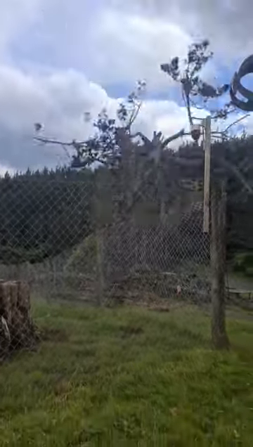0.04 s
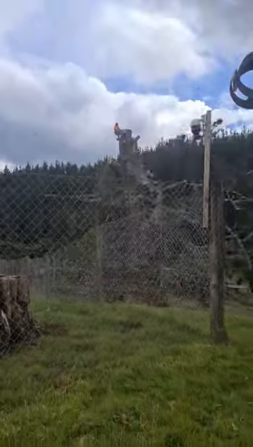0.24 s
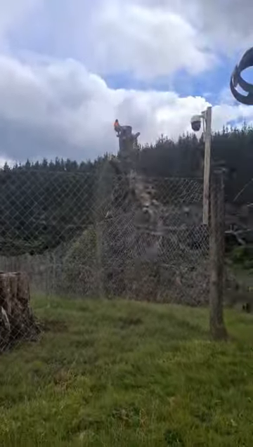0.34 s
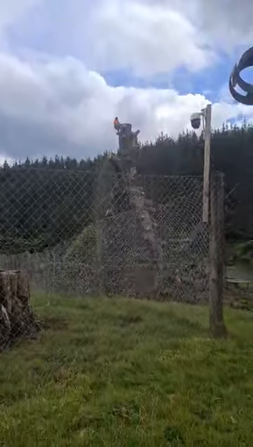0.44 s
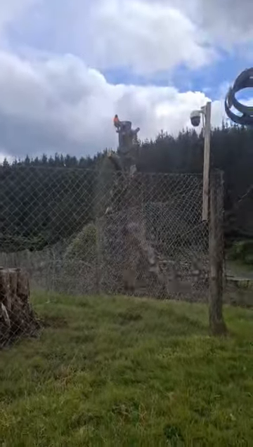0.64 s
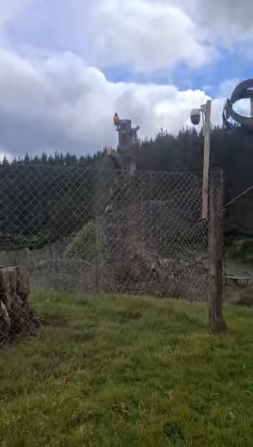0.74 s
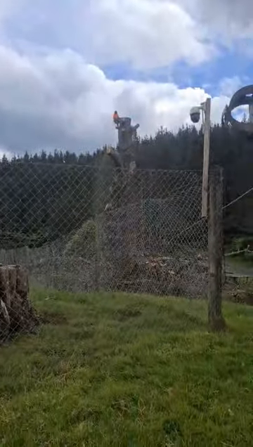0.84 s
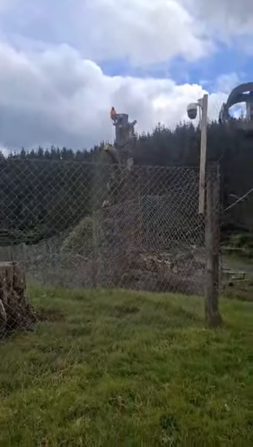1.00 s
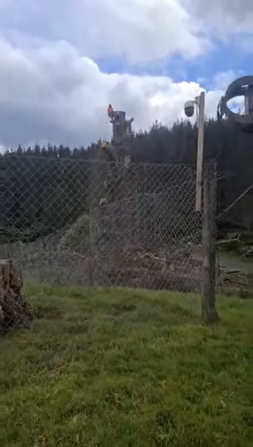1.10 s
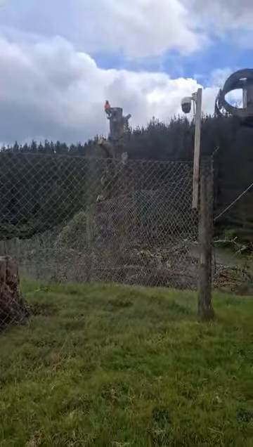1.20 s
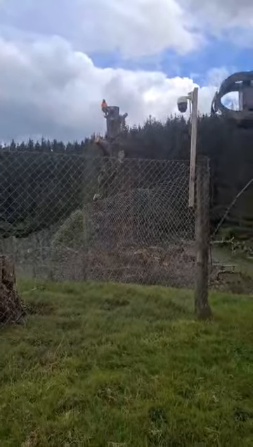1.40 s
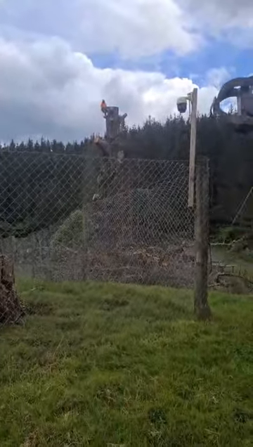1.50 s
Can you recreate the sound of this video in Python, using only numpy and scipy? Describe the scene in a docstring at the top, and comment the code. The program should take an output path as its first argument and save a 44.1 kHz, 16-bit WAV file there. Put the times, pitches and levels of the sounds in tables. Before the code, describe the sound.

A tree top crashes down in an open field. Sharp, brittle limb snaps start about 0.2 seconds in, with a growing rush of needles. From 0.5 to 1.1 seconds heavy wood thuds on the turf amid crackling twigs and loud cracks, echoing faintly. A low engine idles underneath and speeds up around 0.9 seconds. After 1.2 seconds only the engine and a few small snaps remain.

```python
"""In a field below a wooded hillside, a big conifer top falls. Its limbs snap in brittle bursts and ring
in damped modes, branches splinter, needles rush, and heavy wood thuds on the turf.
An engine idles nearby, sounding harmonics of its firing rate, and speeds up as the top lands.
The hillside returns the snaps as a faint, diffuse echo."""
import sys
import numpy as np
from scipy import signal
from scipy.fft import rfft, irfft, next_fast_len
from scipy.io import wavfile
from scipy.ndimage import map_coordinates

SR = 44100
rng = np.random.default_rng(int(sys.argv[2]) if len(sys.argv) > 2 else 0)


def digitize_waveform(pressure):
    """Quantize a signal to 16-bit integers and store it at the path in sys.argv[1].

    Rows of a 2-D input are taken as channels; values are limited to [-1, 1].
    """
    field = np.atleast_2d(pressure).T
    bounded = np.clip(field, -1, 1)
    quanta = np.round(bounded * 32767).astype(np.int16)
    wavfile.write(sys.argv[1], SR, quanta)


N = 68355

# limb fractures (time [s], relative levels of knock [dB], crack [dB] and fizz [dB], lowest mode [Hz])
LIMB_SNAPS = [(.0353,-21.5,-53,-54,1060),(0.1676,-44,-19.5,-38,1510),(0.2163,-17,-6,-21,1182),(0.219,-15,-33,-41,1210),(0.2635,-13,-14,-29,1163),(0.275,-19,-16.5,-33,1560),(0.3125,-17.5,-19,-41,870),(0.318,-17,-23,-42,1410),
              (0.378,-12,-9.5,-28,1605),(0.383,-11.5,-12.5,-33,1074),(0.3857,-19,-14.5,-36,1624),(.4170,-31,-16.5,-34,1400),(0.4365,-17.5,-24,-34,1190),(0.5022,-13,-34,-41,1180),(.5055,-16.5,-10,-21,1000),(0.521,-13,-33,-37,1450),(0.543,-18.5,-13,-26,1870),
              (0.5614,-4.5,-28,-34,1006),(0.5958,-10.5,-33,-28,1004),(.6000,-6.5,-32,-21,1290),(.6490,-12,-33,-19,1270),(0.691,-12,-32,-21,990),(0.696,-12.5,-32,-28,1440),(0.731,-11,-29,-26,1160),
              (0.7403,-11,-34,-16,1270),(0.795,-21,-17,-25,1440),(0.845,-12,-5,-16.5,1255),(0.865,-22,-26,-35,1370),(0.899,-14,-12,-31,1545),(0.9324,-51,-18,-44,1540),(.9655,-22,-25,-29,1170),
              (1.0125,-12.5,-16,-25,780),(1.0170,-15.5,-7.5,-24,1356),(1.0288,-15.5,-10,-48,1420),(1.0460,-17.5,-39,-44,1270),(1.0590,-17.5,-29,-38,960),(1.0755,-25,-23,-29,1530),(1.2670,-21.5,-41,-58,1050),(1.3290,-30,-36,-49,1144)]
# knock, crack and fizz of a snap (decay time [s], gain of the scattered part [dB])
SNAP_PARTS = [(0.0015, -13), (0.00083, -15), (.0008, -10)]
# modes of a limb (frequency [multiple of the lowest], gain [dB], decay time [s])
WOOD_MODES = [(1, -12, 0.0044), (2.53, -9.5, 0.0051), (3.52, -5, 0.0016), (4.3, -7.5, 0.0011)]
# heavy wood landing (time [s], peak level before the low-pass [dB], pitch [Hz], decay time [s])
TURF_IMPACTS = [(0.315,-23.5,109.6,0.087),(.375,-13.5,243,0.011),(.498,-19.5,240,0.013),(.515,-19,82,0.06),(0.546,-17.5,219,0.084),(0.613,-13,160,0.026),(.650,-8.5,196,0.06),(.662,-6.5,270,0.0082),(.718,-17.5,214,0.062),(.768,-7,309,0.024),
                (.790,-11.5,161,0.012),(0.848,-13,110,0.016),(.856,-8,280,0.045),(0.898,-15.5,181,0.019),(.912,-10.5,106,0.024),(.980,-15.5,306,0.04),(1.009,-7,262,0.0047),(1.005,-10,99,.016),(1.06,-11.5,310,0.012),(1.122,-11.5,297,0.014),(1.138,-15,84.5,0.019)]
# envelopes of drumming small limbs, breaking twigs and rushing needles (time [s], level [dB])
DRUMMING_ENVELOPE = [(0,-42.5),(.3,-29.5),(.48,-30),(.58,-19.5),(.68,-17),(.9,-17),(.96,-22),(1.13,-20),(1.2,-34),(1.55,-35.5)]
TWIG_ENVELOPE = [(0,-45),(.24,-39),(.46,-31),(.58,-21.5),(.68,-18.5),(.76,-21),(.83,-30),(.87,-22.5),(.98,-28.5),(1.06,-25.5),(1.14,-35.5),(1.2,-45),(1.55,-56)]
NEEDLE_ENVELOPE = [(0,-43),(.2,-35.5),(.48,-31.5),(.58,-24),(.75,-23),(.82,-27.5),(.87,-27),(.96,-31),(1.05,-31),(1.2,-44.5),(1.55,-77.5)]
# spectra of the same three (frequency [Hz], relative level [dB])
DRUMMING_SPECTRUM = [(25,-55),(55,-4.5),(90,-2.5),(180,1.5),(340,-1),(420,-8.5),(520,-18),(900,-45.5)]
TWIG_SPECTRUM = [(200,-25.5),(480,-7.5),(720,2.5),(1000,-5.5),(1350,0.5),(1900,-11.5),(2400,-7),(3300,-16),(5000,-26.5),(8000,-43),(16000,-26)]
NEEDLE_SPECTRUM = [(500,-17.5),(2000,3.5),(3300,-1.5),(4300,0),(6000,-0.5),(7200,-5.5),(10000,-6),(15000,-14)]
# thin, bright ticks (time [s], level [dB])
TREBLE_TICKS = [(.1470,-36),(0.1666,-23),(0.2218,-21.5),(.2915,-24),(.5438,-20),(0.748,-24),(1.061,-27),(1.201,-39),(1.4169,-27.5)]
# engine speed (time [s], firing rate [Hz])
FIRING_RATE = [(0,27.8),(.71,29.3),(.82,28),(1.0,42.3),(1.2,44.5),(1.36,44.7),(1.55,43)]
# exhaust harmonics (frequency [multiple of the firing rate], level at idle [dB], level at speed [dB])
EXHAUST_HARMONICS = [(1,-39,-29),(2,-31,-35),(3,-38,-39),(4,-45,-43),(5,-50,-46),(6,-48,-45)]
# engine clatter (frequency [Hz], relative level [dB])
CLATTER_SPECTRUM = [(25,-19),(60,-6.5),(150,-17.5),(280,-10.5),(400,-13.5),(600,-13),(850,-18.5),(1350,-13),(2000,-28),(2700,-27.5),(3500,-34.5),(6000,-36),(8000,-43.5),(15000,-47)]
# hillside reverberation (frequency [Hz], time to fall 60 dB [s])
HILL_T60 = [(100,1),(1200,1),(4000,0.46),(12000,0.22)]
# left-right likeness of the direct snaps and of all else (frequency [Hz], coherence [0 to 1])
SNAP_COHERENCE = [(500,0.59),(1400,0.73),(4500,0.48),(14000,0.3)]
FIELD_COHERENCE = [(100,1),(350,0.97),(700,0.72),(1400,0.73),(2500,0.44),(4500,0.26),(14000,0.12)]
# level difference between the ears (frequency [Hz], left minus right [dB])
EAR_BALANCE = [(60, 0), (99, -5), (160, 2), (270, -2), (450, -4), (740, 5), (1220, -6.5), (2010, 0.5),
               (3330, 0.5), (5500, -1), (9080, -1.5), (15000, -2.5)]


def snaps():
    """Brittle fracture: each limb fails in a burst that excites its modes; the crown scatters the sound."""
    out, t = np.zeros((2, N)), np.arange(SR // 12) / SR
    rise_s, scatter_s, direct_db = .00025, .0096, 2
    crack_hz, fizz_hz = (2700, 6100), (6500, 15000)
    rise = 1 - np.exp(-t / rise_s)
    for s, knock, crack, fizz, ring_hz in LIMB_SNAPS:
        knock_hz = (.8 * ring_hz, 1.7 * ring_hz)
        bands = knock_hz, crack_hz, fizz_hz
        for db, band_hz, (decay_s, scatter_db) in zip((knock, crack, fizz), bands, SNAP_PARTS):
            add(out, s, amp(db + direct_db) * burst(rise * np.exp(-t / decay_s), band_hz))
            add(out, s, amp(db + scatter_db) * burst(rise * np.exp(-t / scatter_s), band_hz))
        # the lowest mode scales with the knock, the upper three with the crack
        for db, (multiple, mode_db, decay_s) in zip((knock, crack, crack, crack), WOOD_MODES):
            ring = np.sin(2 * np.pi * (multiple * ring_hz * t + rng.random((2, 1))))
            add(out, s, amp(db + mode_db) * rise * np.exp(-t / decay_s) * ring)
    return spread(out, SNAP_COHERENCE)


def thuds():
    """Damped impact: each heavy limb hits the turf with a dull, narrow-band boom that dies quickly."""
    out, t = np.zeros((2, N)), np.arange(SR // 5) / SR
    rise_s, width_octaves, cutoff_hz = .0033, .32, 430
    for s, db, pitch_hz, decay_s in TURF_IMPACTS:
        band = lambda hz: np.exp(-.5 * (np.log2((hz + 1) / pitch_hz) / width_octaves) ** 2)
        rumble = filtered(rng.standard_normal((2, len(t))), band)
        boom = np.cos(np.angle(signal.hilbert(rumble)))  # steady amplitude, wandering pitch
        envelope = (1 - np.exp(-t / rise_s)) ** 2 * np.exp(-t / decay_s)
        add(out, s, amp(db) * envelope / envelope.max() * boom)
    return spread(filtered(out, lambda hz: 1 / (1 + (hz / cutoff_hz) ** 10)))


def crown():
    """Incoherent summation: the collapsing crown's many small impacts and fractures merge into noise."""
    drumming_gain = amp(curve(DRUMMING_ENVELOPE))
    drumming = drumming_gain * crackle(DRUMMING_SPECTRUM, per_s=260, unevenness_db=.5, hiss=.237)
    twig_gain = amp(curve(TWIG_ENVELOPE) + 3.48 * wobble(per_s=69.95))
    twigs = twig_gain * crackle(TWIG_SPECTRUM, per_s=550, unevenness_db=3.5, hiss=.66)
    needle_gain = amp(curve(NEEDLE_ENVELOPE) + 2.33 * wobble(per_s=59.07))
    needles = needle_gain * crackle(NEEDLE_SPECTRUM, per_s=2700, unevenness_db=6.5, hiss=1.0)
    return drumming + twigs + needles


def ticks():
    """Short transients: treble noise that decays within milliseconds is heard as thin, dry ticks."""
    out, t = np.zeros((2, N)), np.arange(SR // 100) / SR
    decay_s = .0016
    for s, db in TREBLE_TICKS:
        add(out, s, amp(db) * burst(np.exp(-t / decay_s), band_hz=(5490, 15250)))
    return spread(out)


def engine():
    """Periodic excitation: firings make a harmonic exhaust throb and modulate the clatter's amplitude."""
    clatter_idle_db, clatter_rise_db = -34, .5
    firing_hz = curve(FIRING_RATE)
    speed = (firing_hz - firing_hz.min()) / np.ptp(firing_hz)  # 0 at idle, 1 at the fastest
    phase = 2 * np.pi * np.cumsum(firing_hz * (1 + .0076 * wobble(per_s=23.76))) / SR
    throb = np.zeros(N)
    for order, idle_db, fast_db in EXHAUST_HARMONICS:
        rms_db = idle_db + speed * (fast_db - idle_db) + .92 * wobble(per_s=10.5)
        throb += 2 ** .5 * amp(rms_db) * np.cos(order * phase + rng.normal(0, .67))
    pulsing_noise = rng.standard_normal((2, N)) * (1 + .22 * np.cos(phase))
    clatter = unit(spread(coloured(pulsing_noise, CLATTER_SPECTRUM)))
    return throb + amp(clatter_idle_db + clatter_rise_db * speed) * clatter


def hillside(x):
    """Diffuse reflection: the trees answer with a noise-like tail whose treble dies first."""
    hz, t, noise = signal.stft(rng.standard_normal((2, SR // 2)), SR, nperseg=256)
    decay = amp(-60 * t / along(HILL_T60, hz)[:, None])
    tail = signal.istft(noise * decay, SR, nperseg=256)[1]
    tail /= np.linalg.norm(tail[0])
    echo = signal.fftconvolve(x.mean(axis=0)[None], tail, axes=1)
    return spread(echo[:, :N])


def burst(envelope, band_hz):
    """Band-limited noise: two independent bursts, each with the energy of the envelope."""
    band = signal.butter(3, band_hz, "band", fs=SR, output="sos")
    pair = signal.sosfilt(band, envelope * rng.standard_normal((2, len(envelope))))
    return pair * np.linalg.norm(envelope) / np.linalg.norm(pair, axis=1, keepdims=True)


def crackle(spectrum, per_s, unevenness_db, hiss):
    """Shot noise: random impulses of uneven size over a hiss, at rms 1."""
    struck = rng.random(N) < per_s / SR
    sizes = amp(unevenness_db * np.minimum(rng.exponential(size=N), 3))
    impulses = unit(struck * sizes * rng.choice([-1, 1], (2, N)))
    excitation = impulses + hiss * rng.standard_normal((2, N))
    return unit(spread(coloured(excitation, spectrum)))


def spread(pair, coherence=FIELD_COHERENCE):
    """Partial coherence: two independent signals, as mid and side, become left and right."""
    angle = lambda hz: np.arccos(np.clip(along(coherence, hz), -1, 1)) / 2
    mid, side = filtered(pair, lambda hz: np.array([np.cos(angle(hz)), np.sin(angle(hz))]))
    return np.array([mid + side, mid - side])


def coloured(x, spectrum):
    """Minimum-phase filtering: x is shaped by the spectrum with no ringing ahead of an onset."""
    size = 4096
    cepstrum = irfft(np.log(amp(along(spectrum, np.fft.rfftfreq(size, 1 / SR)))))
    cepstrum[1:size // 2] *= 2
    cepstrum[size // 2 + 1:] = 0
    impulse_response = irfft(np.exp(rfft(cepstrum)))
    return signal.fftconvolve(x, impulse_response[None], axes=1)[:, :N]


def filtered(x, response):
    """Linear filtering: the spectrum of x is multiplied by a frequency response."""
    size = next_fast_len(x.shape[-1] + SR // 4)
    return irfft(rfft(x, size) * response(np.fft.rfftfreq(size, 1 / SR)), size)[..., :x.shape[-1]]


def add(track, s, sound):
    """Superposition: a sound joins the track at time s."""
    part = track[..., max(round(s * SR), 0):][..., :sound.shape[-1]]
    part += sound[..., :part.shape[-1]]


def wobble(per_s):
    """Random modulation: a smooth curve through per_s Gaussian values a second."""
    return map_coordinates(rng.standard_normal(400), [np.arange(N) * per_s / SR], mode="wrap")


def curve(points):
    """Linear interpolation of (time [s], value) points at every sample."""
    return np.interp(np.arange(N) / SR, *np.transpose(points))


def along(points, hz):
    """Interpolation of (frequency [Hz], value) points on a logarithmic axis."""
    point_hz, values = np.transpose(points)
    return np.interp(np.log(hz + 1), np.log(point_hz + 1), values)


def amp(db):
    """The decibel law: level to amplitude ratio."""
    return 10 ** (np.asarray(db) / 20)


def unit(x):
    """Normalisation to rms 1."""
    return x / np.sqrt(np.mean(x ** 2) + 1e-20)


def scene():
    """Interaural time and level differences set the fall, its echo and the engine slightly to the right."""
    echo_db, left_lag_s = -10.5, .00006
    breaks = snaps()
    mix = breaks + amp(echo_db) * hillside(breaks) + ticks() + thuds() + crown() + engine()
    sides = np.array([[.5], [-.5]])  # each ear takes half of the difference
    balance = lambda hz: amp(sides * along(EAR_BALANCE, hz))
    delay = lambda hz: np.exp(-2j * np.pi * hz * sides * left_lag_s)
    return filtered(mix, lambda hz: balance(hz) * delay(hz))


def record(dry):
    """Soft saturation rounds off the highest peaks; band limiting cuts the top of the treble."""
    top_hz = 15600
    rounded = dry / (1 + np.abs(dry) ** 8) ** (1 / 8)
    return filtered(rounded, lambda hz: hz < top_hz)


dry = scene()
out = record(dry)
digitize_waveform(out)
```